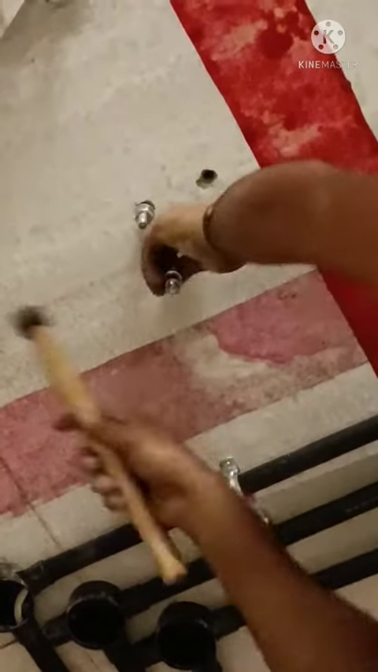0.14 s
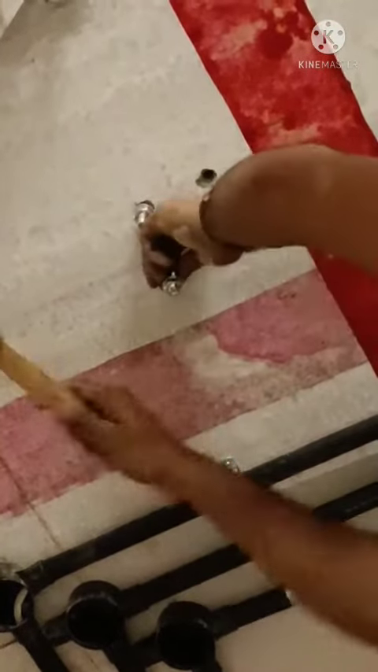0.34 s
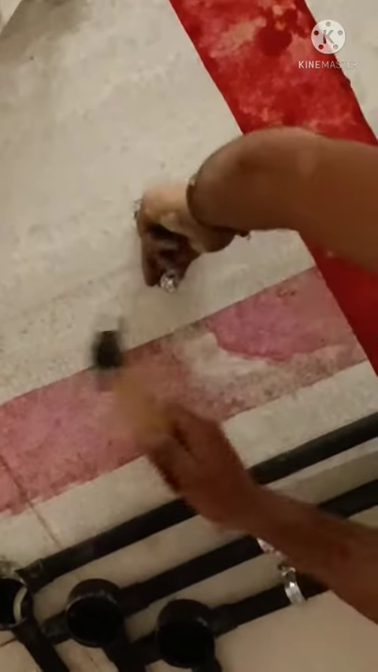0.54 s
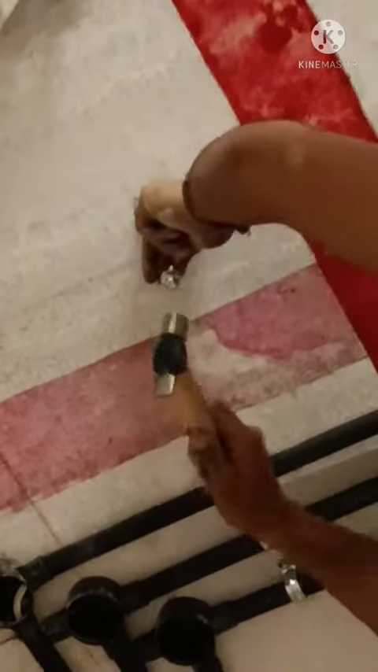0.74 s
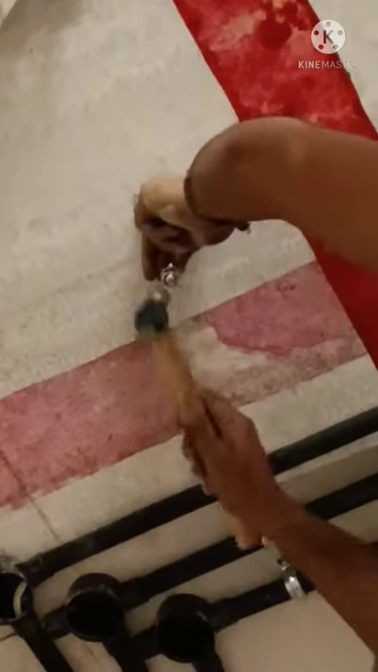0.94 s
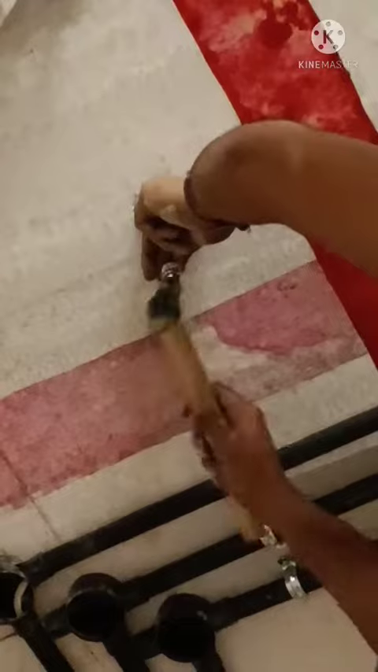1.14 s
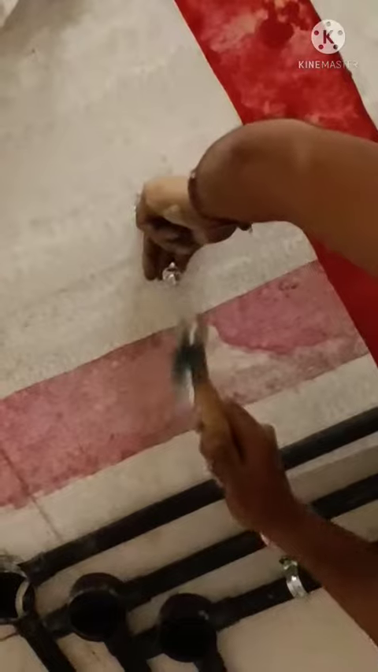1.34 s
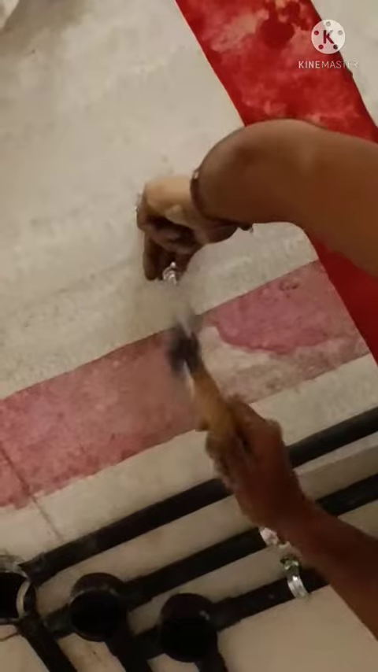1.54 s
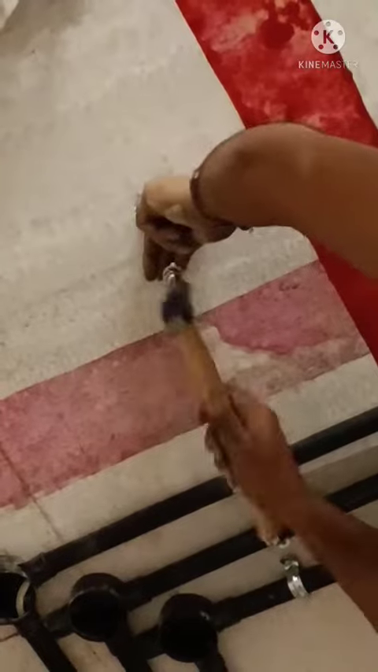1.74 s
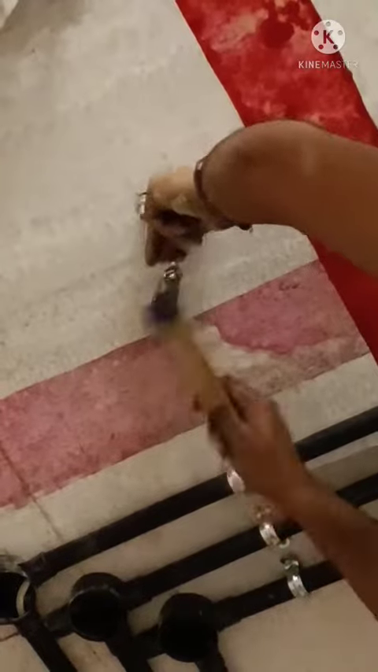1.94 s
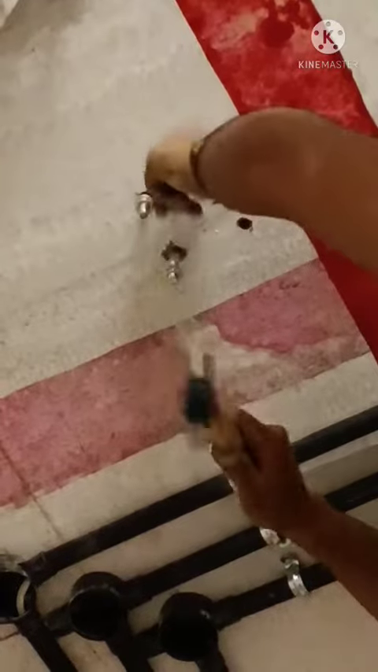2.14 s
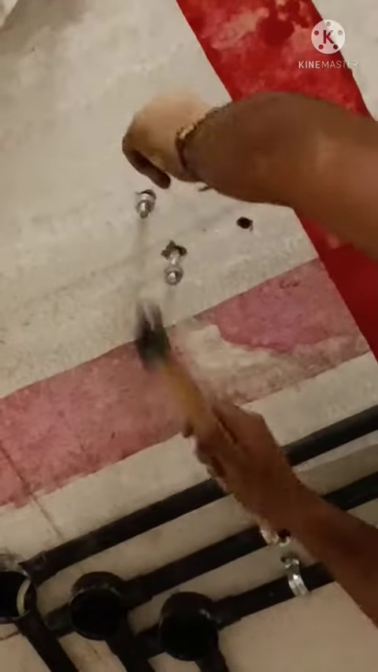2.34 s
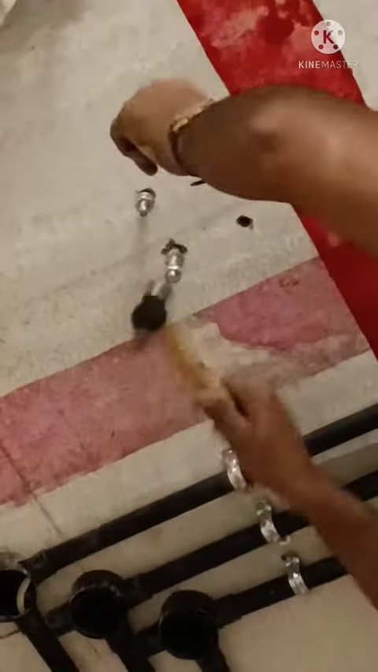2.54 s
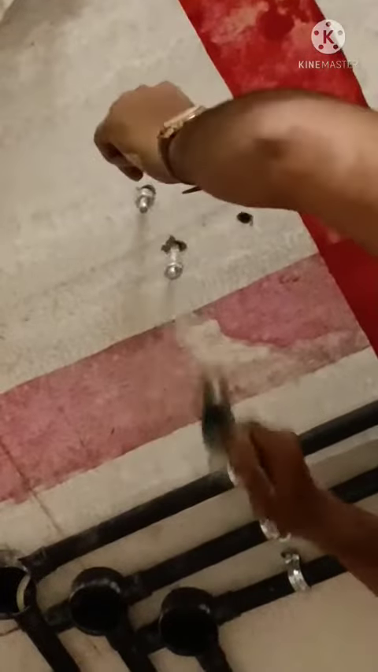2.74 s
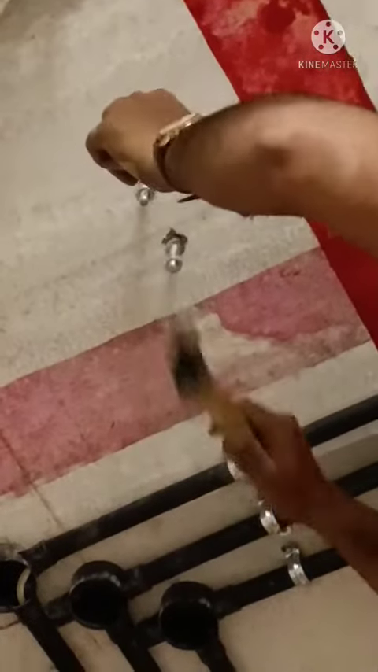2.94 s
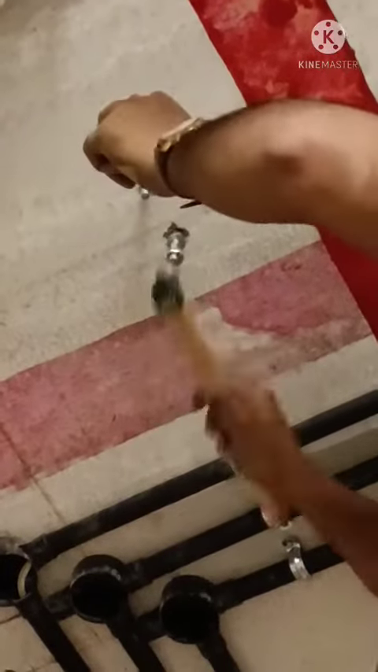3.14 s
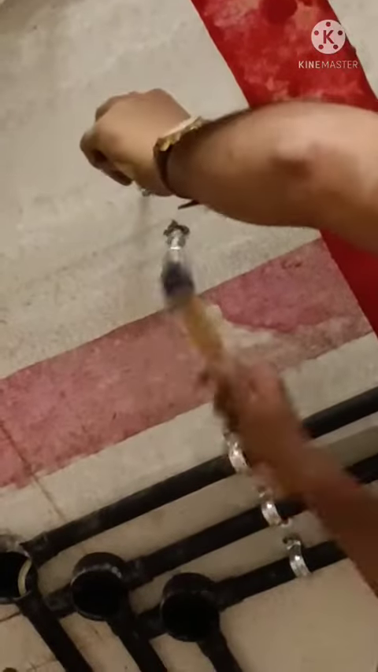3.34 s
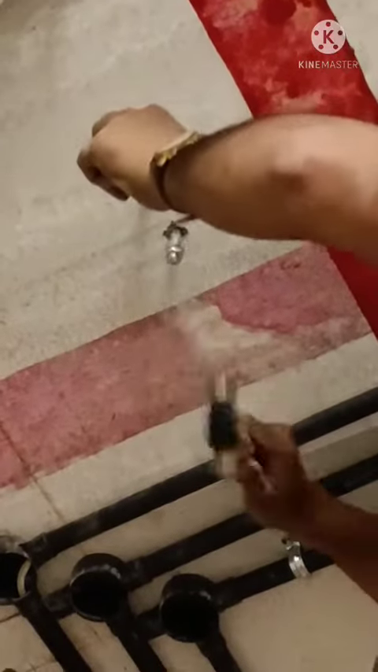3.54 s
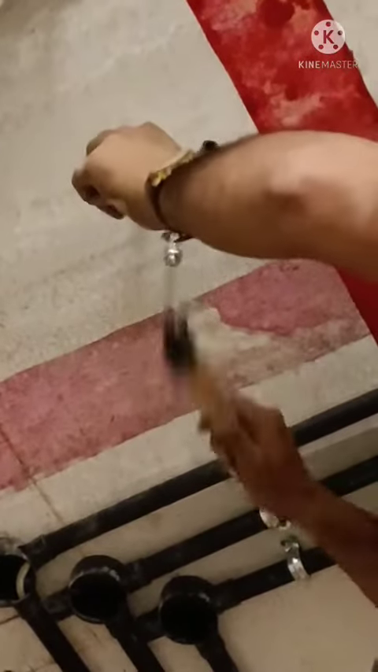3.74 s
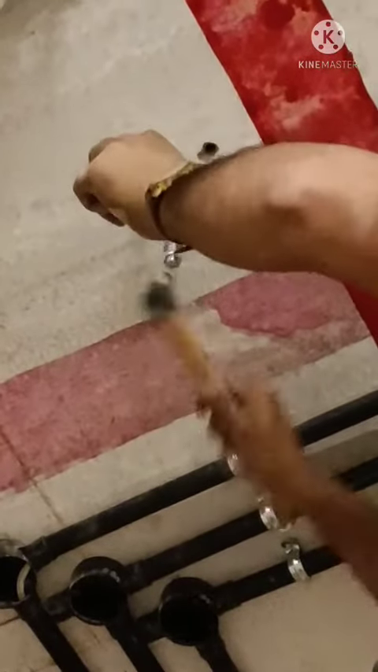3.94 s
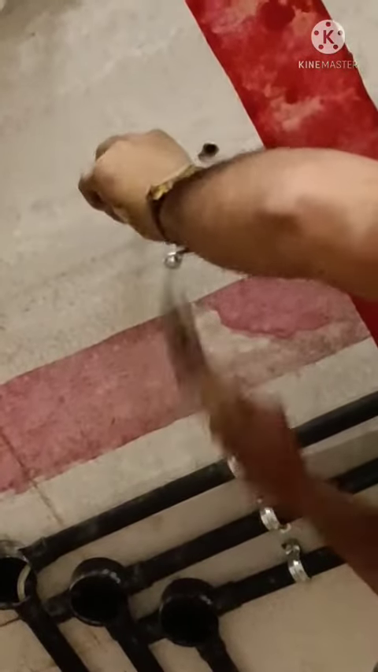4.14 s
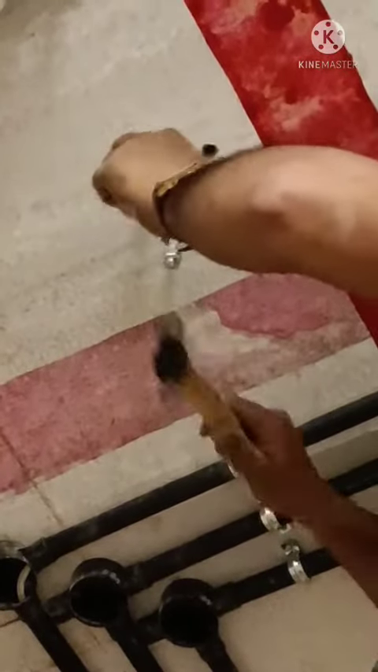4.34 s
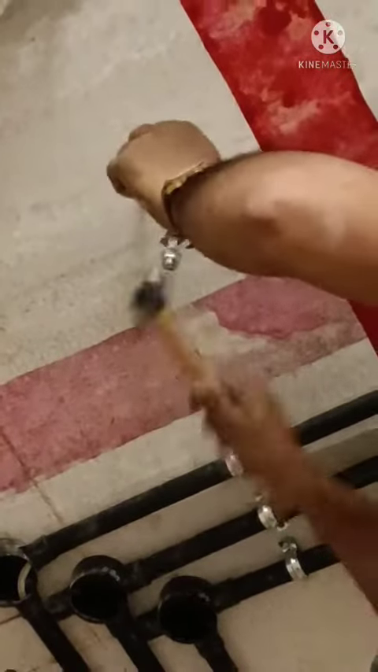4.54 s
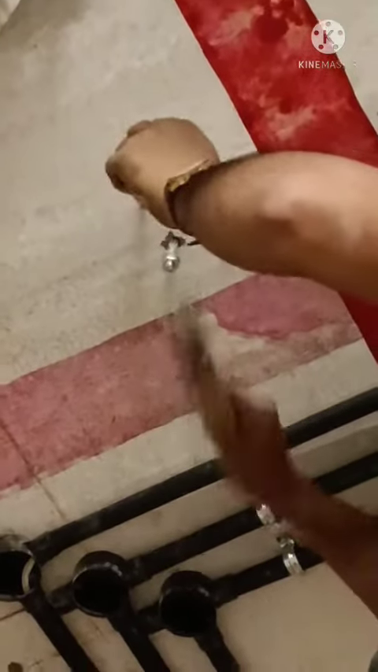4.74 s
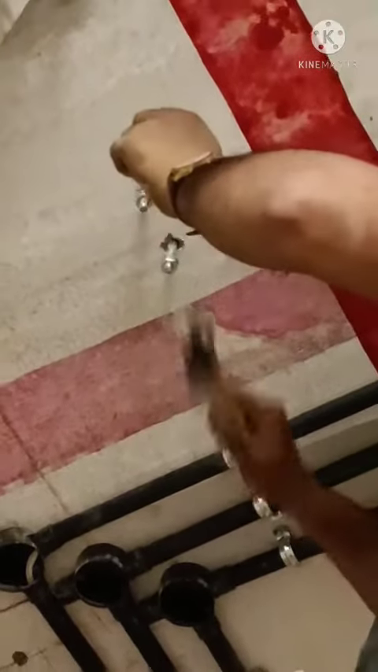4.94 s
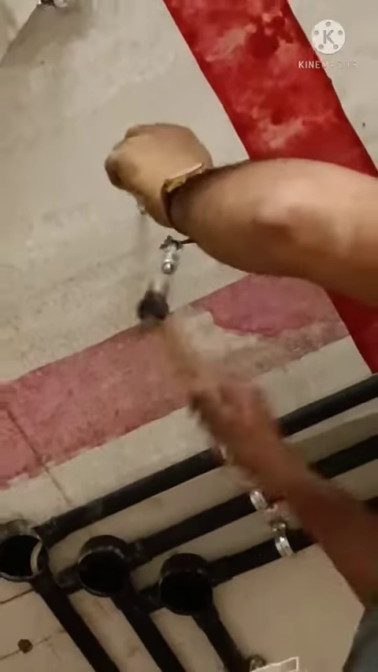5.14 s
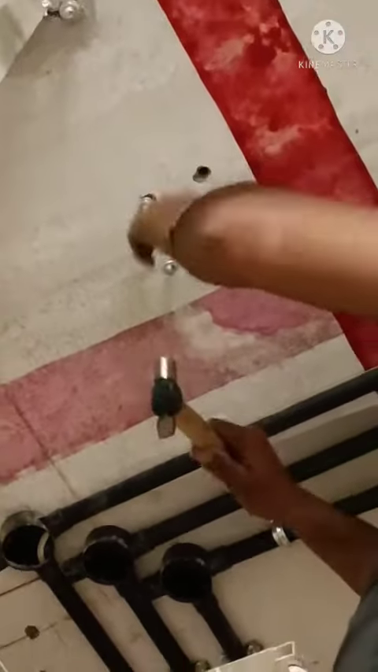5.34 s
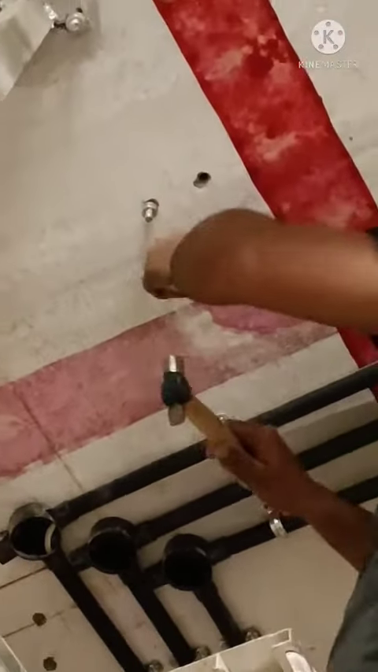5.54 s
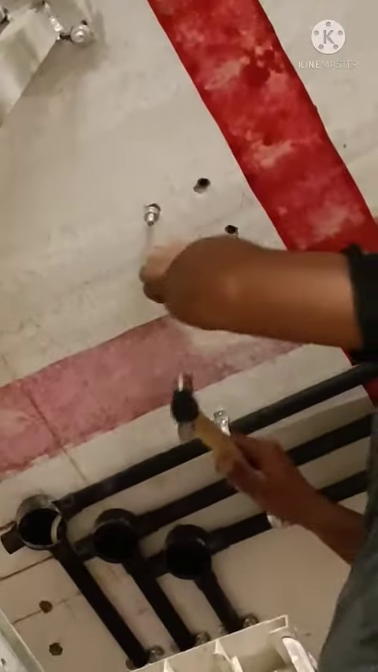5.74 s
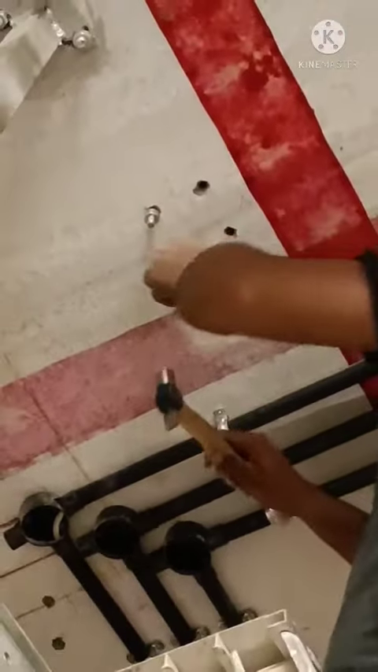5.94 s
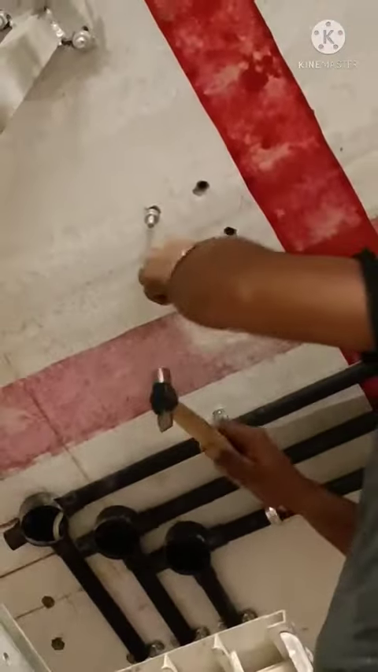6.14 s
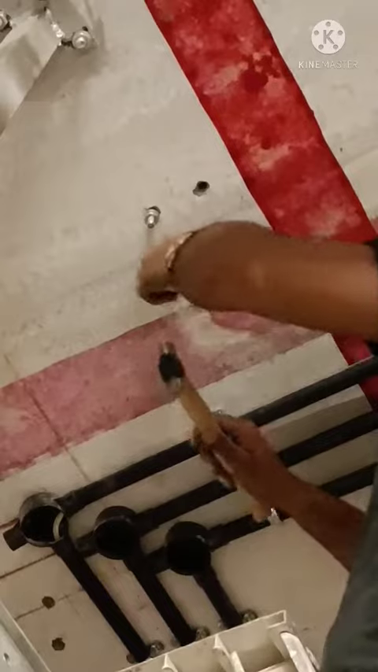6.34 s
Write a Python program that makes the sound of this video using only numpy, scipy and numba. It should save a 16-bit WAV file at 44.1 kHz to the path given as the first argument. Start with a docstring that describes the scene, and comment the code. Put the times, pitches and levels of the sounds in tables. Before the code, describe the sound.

A small hammer drives a steel bolt into a concrete ceiling. After a faint tick of loose hardware come sixteen evenly paced blows, nearly four a second, each a sharp snap with a brief metallic ring and a knock. They start lighter and grow stronger. When they stop, the echo fades and the hardware ticks again. A ventilation fan hums throughout the bare basement, heard on a phone from just below.

```python
"""Anchor bolt in a bare basement

Overhead, a small hammer drives a steel bolt into the concrete ceiling: sixteen blows, each a snap, a
brief ring of hammer and bolt and a knock of the slab, then a long echo from the hall. A ventilation
fan hums throughout; loose hardware ticks before and after. Heard from below on a phone's two
microphones, whose limiter ducks after a hard blow, so the echo swells up behind it."""
import sys
import numpy as np
from scipy import signal
from scipy.fft import rfft, irfft, next_fast_len
from scipy.io import wavfile
from scipy.ndimage import uniform_filter1d
from numba import njit

SR = 44100
rng = np.random.default_rng(int(sys.argv[2]) if len(sys.argv) > 2 else 0)


def unload_audio(sound):
    """Save the sound as a 16-bit wav file, at the path given as the first command line argument."""
    columns = np.transpose(np.atleast_2d(sound))
    # keep every value between -1 and 1, then stretch to whole-number steps
    steps = np.round(np.clip(columns, -1, 1) * 32767)
    wavfile.write(sys.argv[1], SR, steps.astype(np.int16))


N = 285327

# room sound across the two microphones: (frequency [Hz], likeness [0-1])
LIKENESS = [(130, 0.94), (290, 0.84), (640, 0.32), (1400, 0)]
# air in the duct: (frequency [Hz], relative level [dB])
DUCT_RUSH = [(30, -56), (70, -4.5), (110, 6), (200, -2.5), (400, -10), (700, -19), (1500, -15.5),
             (2500, -27.5), (3900, -18.5), (5400, -32), (7200, -35.5), (8300, -55), (12500, -48),
             (16000, -26.5)]
# fan tones: (frequency [Hz], width [Hz], rms level in the room [dB])
FAN_TONES = [(101.5, 31, -46.5), (118.8, 16, -37.5), (141, 10, -43), (173, 4, -63), (312.5, 17, -50),
             (347.1, 5.4, -47.5), (497, 1.5, -57)]
# loose washer and nut: (time [s], level [dB], treble tilt [dB/octave], ring [Hz])
TICKS = [(0.2717, -21, -9, 4300), (0.2965, -25, -6, 4200), (5.5495, -19, 7, 7300), (5.5635, -22, 5, 6000),
         (5.573, -24, 6, 6500), (6.3884, -10, -1, 6000), (6.3995, -14, 1, 6000), (6.410, -18, 3, 6000)]
# snap of steel on steel: (frequency [Hz], relative level [dB])
CRACK_COLOUR = [(300, -24.5), (700, -11.5), (1500, 1), (3200, 7), (5500, 10.5), (8000, -6), (12000, -1),
                (14000, 13.5), (16000, 11.5)]
# main decay of the hall: (frequency [Hz], time to fall 60 dB [s])
HALL_T60 = [(200, 5.1), (900, 3.49), (2500, 0.94), (4500, 0.79), (6600, 0.35), (13000, 0.38)]
# far end of the basement, weaker and longer: (frequency [Hz], level [dB])
FAR_ECHO = [(900, -7), (4500, -13), (7000, -8), (13000, -23)]
# floor and nearest walls, first and loudest: (frequency [Hz], level [dB])
CLOSE_ECHO = [(700, 28), (2500, 20), (4500, 14.5), (13000, 18)]
# echo bunches from facing walls: (delay [s], bass [dB], treble [dB], spread [s], top octave [dB])
SLAPS = [(.021, 2.5, 4.5, 0.0054, 3.5), (0.047, 10, 5, 0.004, 5.5), (0.085, 6.5, -0.3, .045, 2),
         (0.11, -1, 2, 0.031, .3)]
# hammer blows; a clean hit is bright, an off-centre aim shifts the ring between modes:
# (time [s], strength [dB], brightness [dB], aim [dB], bolt shank [dB], hammer head [dB],
#  slab knock [dB], low bolt clang [dB], direct sound [dB])
BLOWS = [(0.9344, -36, 7, -4.5, 1.5, 4, -14, 2, -5.5), (1.2042, -31, -18.5, -8.5, -7, 2.5, 3, 8, -7.5),
         (1.4745, -26, 8, 1, -25, 0.5, -4.5, -2, -4.5), (1.7428, -22, -11, 3.5, 6.5, 1.5, -3.5, -1, -4.5),
         (2.0137, -25, -23.5, -4, 8, 8, 0, 7, -5), (2.3122, -19.5, -20, 0.5, 3.5, 6.5, -2.5, -14, -3.5),
         (2.5955, -20, 0, 2.5, 3, 2, -7, 4.5, 0.5), (2.8824, -19, -1.5, 1, -1.5, 1, -9, 2, 1),
         (3.155, -17.5, 0, 2.5, -0.5, 1, -5, -19, -1.5), (3.429, -19, 5, 1, 0.5, -5, -11, -4, 0.5),
         (3.7008, -18.5, 1.5, 1.5, 2, 1.5, -7.5, 2, 1), (3.9745, -17.5, 0.5, 1.5, -1.5, 2, -11, 5.5, 1.5),
         (4.2589, -18, -16, -4, 1.5, 12.5, -8.5, 5, 1.5), (4.5788, -19, -1, -2.5, 2, 1, -7.5, 2, -2),
         (4.8692, -23, 2, -4, -2, 11, -4, -2, -2), (5.1816, -23, 0, -7.5, -3, 9.5, -3.5, -4, -2.5)]
# modes of hammer head and gripped bolt: (frequency [Hz], width [Hz])
STEEL_MODES = [(906, 270), (2474, 383), (4063, 850), (4520, 300), (6550, 810), (13570, 410), (14300, 4500),
               (902, 75), (1510, 780), (2430, 33), (2590, 56), (3840, 110), (4595, 170), (7485, 240)]
# how a blow feeds each mode as the bolt seats:
# (starting level [dB], change per blow [dB], brightness weight [ratio], aim weight [ratio])
MODE_FEED = [(-24, -0.2378, 0.08, 0.24), (-20, .5, 0.17, -0.97), (-11.5, 0.1373, 0.69, -1.28),
             (1, -1.23, 0.21, 0.33), (-10, -0.2033, 0.24, -1.05), (-16, 0.37, 0.8, -0.096),
             (-15.5, -0.17, 0.89, 0.67), (-36.5, 0, 0, 0.17), (-29, 0.0676, 0, -0.76),
             (-26, .5, 0.39, -0.064), (-28.5, 0.85, 0.53, -0.63), (-20.5, -0.1, 0, 1),
             (-9.5, -0.13, 0.22, 1), (-24, -0.2344, 0.24, -0.15)]
# rows of STEEL_MODES: (shank [index], head [index], knock [index], clang [index])
PART_MODES = [1, 3, 0, 2]
# direct path over what enters the hall; the top radiates up and away: (frequency [Hz], gain [dB])
DIRECT_PATH = [(300, 16), (750, 14), (1400, 14.5), (2500, 17), (3300, 15.5), (4000, 11.5), (4600, 12.5),
               (7000, 5.5), (13000, 8)]
# microphone ports: (frequency [Hz], gain [dB], left minus right [dB])
MIC_PORTS = [(94.7, -13.5, 0), (659, 4.5, 1), (1215, -3.16, -2.5), (2450, -2.2, -1.5), (4384, -6.5, -12.5),
             (4840, -7.5, -1), (4850, -10, -1), (7810, 3.5, -5.5), (7780, -8.5, 2), (8260, 7.5, 5),
             (10060, 0, 2), (11420, 8.5, 0.5), (15400, -9.5, -1.5)]
# a deep gap in the treble: (frequency [Hz], gain [dB])
TREBLE_NOTCH = [(8500, 0), (8900, -18), (9700, -55), (11200, -55), (11600, 0)]


def undb(db):
    return 10 ** (np.asarray(db) / 20)


def along(table, hz, axis=1):
    """A table column, interpolated over log frequency."""
    rows = np.array(table)
    return np.interp(np.log(hz + 1), np.log(rows[:, 0]), rows[:, axis])


def unit_energy(x):
    return x / np.sqrt(np.sum(x ** 2))


def bins(size):
    return np.arange(size // 2 + 1) * SR / size


def add(out, start_s, x):
    i = int(start_s * SR)
    out[..., i:i + x.shape[-1]] += x[..., :N - i]


def resonance(f, hz, width):
    return 1 / (1 + (2 * (f - hz) / width) ** 2)


def noise_pair(size):
    """Left and right noise spectra, alike in the bass and unrelated in the treble."""
    mid, side = rfft(rng.standard_normal((2, size)))
    alike = along(LIKENESS, bins(size))
    return np.sqrt(1 + alike) * mid + np.sqrt(1 - alike) * side * np.array([[1], [-1]])


def bands(spectra, size):
    """Overlapping third-octave bands: centre frequency and signal."""
    place = 3 * np.log2(bins(size) + 1)
    for k in range(14, 44):
        yield 2 ** (k / 3), irfft(spectra * np.clip(1 - abs(place - k), 0, 1), size)


def waver(rate_hz):
    """Random steps, smoothed twice."""
    k = int(SR / rate_hz)
    steps = np.repeat(rng.standard_normal(N // k + 1), k)
    return uniform_filter1d(uniform_filter1d(steps, k), k)[:N]


def causal(db):
    """Shortest response with the given gain per bin, by folding the cepstrum."""
    cep = irfft(np.log(undb(db)))
    half = cep.shape[-1] // 2
    cep[..., 1:half] *= 2
    cep[..., half + 1:] = 0
    return irfft(np.exp(rfft(cep)))


def fan(rush_db=-35, motor_hz=231.8):
    """Room tone: wavering blade and motor tones over a duct rush whose bands flicker."""
    size, t = next_fast_len(N), np.arange(N) / SR
    swell_db = 0.49 * waver(0.12)
    rush = sum(band[:, :N] * undb(along(DUCT_RUSH, hz) + swell_db + 1.8 * waver(6))
               for hz, band in bands(noise_pair(size), size))
    out = rush * undb(rush_db) / rush.std()
    for hz, width, db in FAN_TONES:
        tone = irfft(noise_pair(size) * resonance(bins(size), hz, width), size)[:, :N]
        out += tone * undb(db) / tone.std()
    shaft = undb(-36 + 3 * waver(13)) * np.sin(np.pi * motor_hz * t)  # half the motor's pitch
    motor = undb(-40.5 + 2.5 * waver(7.06)) * np.sin(2 * np.pi * motor_hz * t)
    return out + np.sqrt(2) * (shaft + motor)


def crack(size, tilt_db=0.):
    """The broad snap of steel on steel."""
    hz = bins(size)
    return unit_energy(causal(along(CRACK_COLOUR, hz) + tilt_db * np.log2((hz + 2000) / 6000)))


def hardware_ticks(size=2048):
    """Washer and nut click and ring briefly, into the hall and straight to the microphones."""
    to_hall, direct = np.zeros(N), np.zeros((2, N))
    for s, db, tilt_db, hz in TICKS:
        ring_db = 12 * resonance(bins(size), hz, width=700)
        click = undb(db) * irfft(rfft(crack(size, tilt_db)) * rfft(causal(ring_db)))
        add(to_hall, s, click)
        add(direct, s, near_scatter(click))
    return to_hall, direct


def near_scatter(x, smear_s=.002, rise_s=.0009):
    """Slab, hand and pipes smear the direct sound on its way to each microphone, keeping its colour."""
    t = np.arange(1024) / SR
    shared, left, right = rng.standard_normal((3, len(t))) * np.exp(-(t / smear_s) ** 2)
    paths = np.array([shared + 1.65 * left, np.roll(shared + 0.5 * right, 4)])  # right lags 4 samples
    window = np.exp(-(t / (2.4 * smear_s)) ** 2) * np.sqrt(np.tanh(t / rise_s))
    for _ in range(6):  # flatten the spectrum, then shorten
        paths = irfft(np.exp(1j * np.angle(rfft(paths)))) * window
    return signal.fftconvolve(x[None], paths, axes=1)


def hall(x, close_s=.012, far_stretch=3.13, gap_s=.00026, build_s=.04):
    """Bare concrete, near and far, echoes along two sets of paths; the treble dies first."""
    size = 110000
    t, tail = np.arange(size) / SR, 0
    bass_db, treble_db, top_db = (
        sum(slap[k] * np.exp(-((t - slap[0]) / slap[3]) ** 2) for slap in SLAPS) for k in (1, 2, 4))
    for hz, band in bands(np.array([noise_pair(size), noise_pair(size)]), size):
        fall = np.log(1000) * t / along(HALL_T60, hz)
        decay = np.hypot(np.exp(-fall), undb(along(FAR_ECHO, hz)) * np.exp(-fall / far_stretch))
        close = np.hypot(1, undb(along(CLOSE_ECHO, hz)) * np.exp(-t / close_s))
        treble, top = along([(1000, 0), (4000, 1)], hz), along([(7000, 0), (12000, 1)], hz)
        slap_db = bass_db + treble * (treble_db - bass_db) + top * (top_db - treble_db)
        tail += band * decay * close * undb(slap_db)
    build_up = np.sqrt(1 - np.exp(-np.maximum(t - gap_s, 0) / build_s))
    tail *= undb(6) * build_up / np.sqrt(2 * SR * .1)
    return signal.fftconvolve(x[:, None], tail, axes=2).sum(axis=0)[:, :N]


def hammer(thud_hz=70, knock_hz=870, knock_t60_s=.017, pitch_scatter=.006):
    """Each blow rings hammer and bolt and jolts the slab right above the microphones."""
    to_hall, direct = np.zeros((2, N)), np.zeros((2, N))
    t, f = np.arange(2048) / SR, bins(2048)
    thud = unit_energy(t * np.exp(-2 * np.pi * thud_hz * t))
    knock = unit_energy(np.sin(2 * np.pi * knock_hz * t) * undb(-60 * t / knock_t60_s))
    snap_power = abs(rfft(crack(len(t)))) ** 2
    for k, (s, strength_db, bright_db, aim_db, *part_db, direct_db) in enumerate(BLOWS):
        mode_db = np.array(MODE_FEED) @ [1, k, bright_db, aim_db]
        mode_db[PART_MODES] += part_db
        power = snap_power.copy()
        for (hz, width), db in zip(STEEL_MODES, mode_db):
            hz *= 1 + pitch_scatter * rng.standard_normal()
            power += undb(db) ** 2 * SR / width * resonance(f, hz, width) ** 1.5
        blow_db = strength_db + 10 * np.log10(power * SR * .1)
        blow = causal(blow_db)
        turn = 2 * np.pi * rng.random()  # the arm shifts: each blow takes its own mix of echo paths
        add(to_hall, s, np.outer([np.cos(turn), np.sin(turn)], blow))
        steel = causal(blow_db + along(DIRECT_PATH, f) + direct_db)
        slab = undb(-51) * thud + undb(-6.5 + .5 * part_db[2] + direct_db) * knock
        add(direct, s, near_scatter(steel))
        add(direct, s, np.linalg.norm(blow) * slab)
    return to_hall, direct


def head_sing(hz=4640, t60_s=2.2, rise_s=.35):
    """The free hammer head sings on thinly, swelling slowly after each blow; the next blow stops it."""
    out, t = np.zeros(N), np.arange(N) / SR
    rise = 1 - np.exp(-(t / rise_s) ** 2)
    tone = np.sin(2 * np.pi * hz * t) * rise * undb(-60 * t / t60_s)
    for s, strength_db, *_ in BLOWS:
        i = int(s * SR)
        out[i:] = undb(strength_db - 5) * tone[:N - i]
    return out * undb(1.5 * waver(3.8))


@njit
def limiter_gain(peak, ceiling, attack_s, hold_s, release_s):
    """Gain falls fast on a peak over the ceiling and climbs back in two slower stages."""
    gain, held, duck = np.empty(len(peak)), 0., 0.
    for i in range(len(peak)):
        over = max(np.log(peak[i] / ceiling + 1e-9), 0.)
        held = max(over, held * (1 - 1 / (hold_s * SR)))
        duck += (held - duck) / (SR * (attack_s if held > duck else release_s))
        gain[i] = np.exp(-duck)
    return gain


def scene():
    """The basement from under the bolt: direct sound, echo and fan."""
    blows_to_hall, blows = hammer()
    ticks_to_hall, ticks = hardware_ticks()
    return blows + head_sing() + ticks + hall(blows_to_hall + undb(-6.5) * ticks_to_hall) + fan()


def record(dry, look_ahead_s=.00013, overload=.49, top_hz=15500):
    """Microphone ports, a deep gap in the treble, then the phone's linked limiter, soft overload and top cut."""
    hz = bins(2048)
    ports_db = [along(MIC_PORTS, hz) + side * along(MIC_PORTS, hz, axis=2) / 2 for side in (1, -1)]
    mics = signal.fftconvolve(dry, causal(ports_db), axes=1)[:, :N]
    peak = abs(mics).max(axis=0)
    gain = limiter_gain(peak, float(undb(-3.5)), attack_s=.00027, hold_s=.019, release_s=.019)
    notched = signal.fftconvolve(mics, causal(along(TREBLE_NOTCH, hz))[None], axes=1)[:, :N]
    limited = notched * np.roll(gain, -int(look_ahead_s * SR))
    clipped = overload * np.tanh(limited / overload)  # its rasp fills the notch on peaks
    return signal.sosfilt(signal.ellip(10, .2, 80, top_hz, fs=SR, output="sos"), clipped)


dry = scene()
out = record(dry)
unload_audio(out)
```